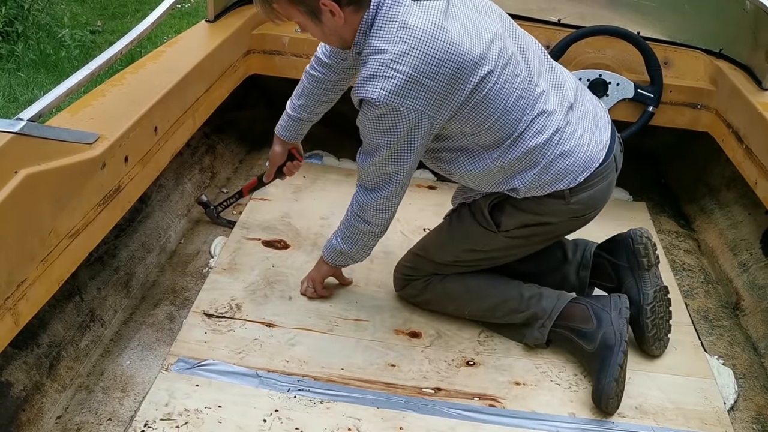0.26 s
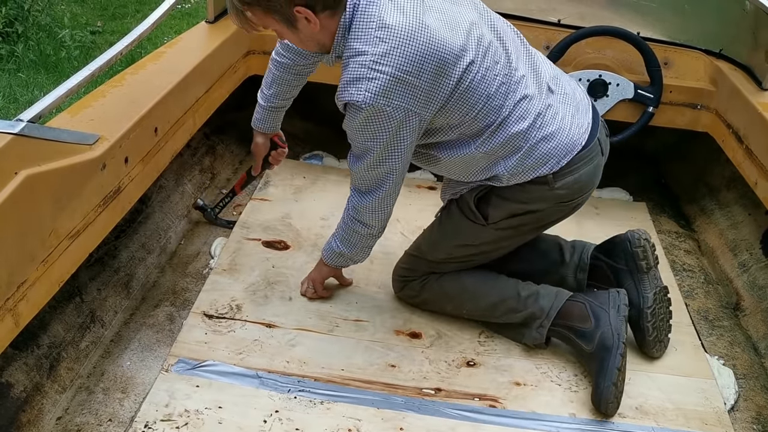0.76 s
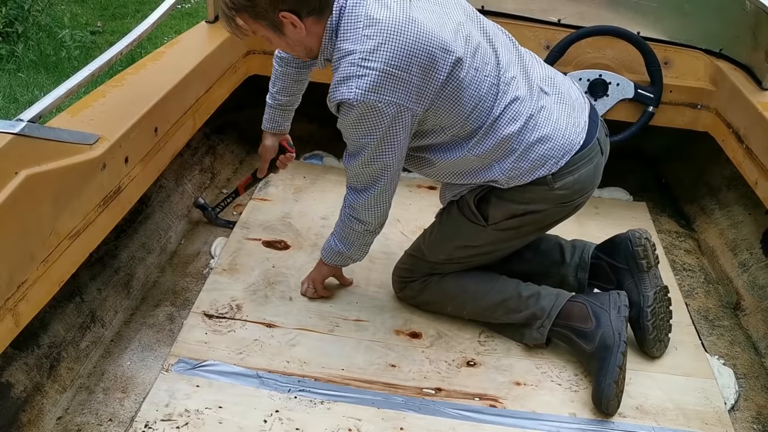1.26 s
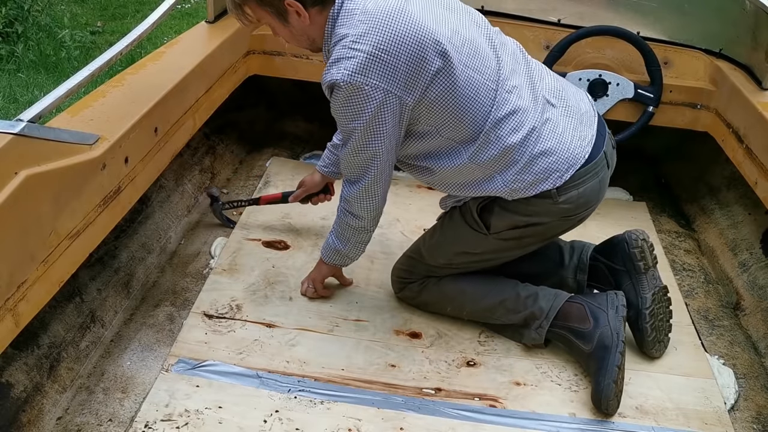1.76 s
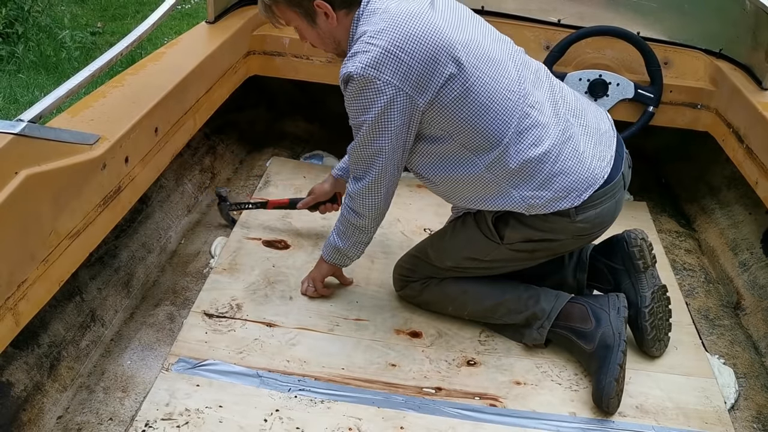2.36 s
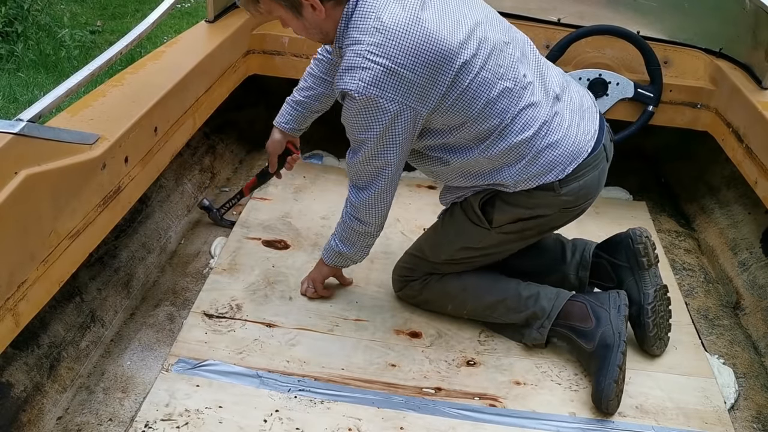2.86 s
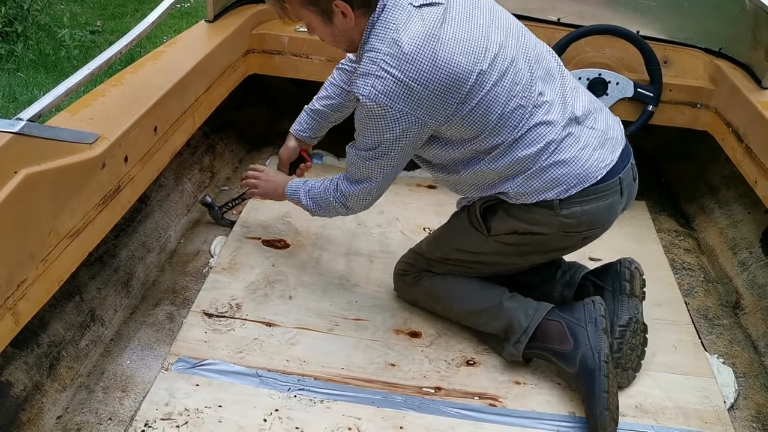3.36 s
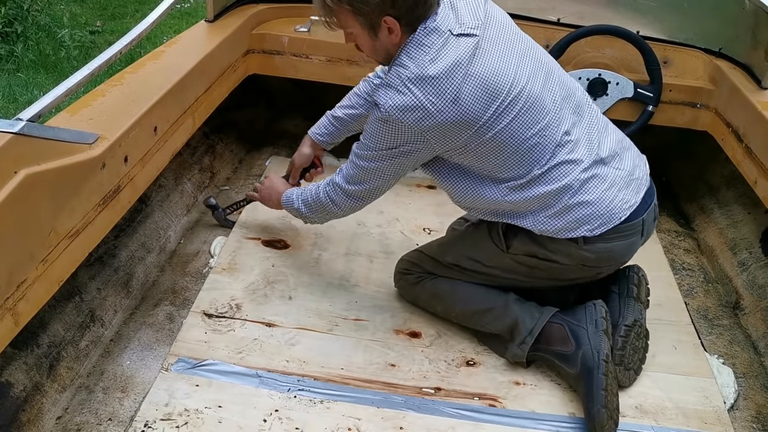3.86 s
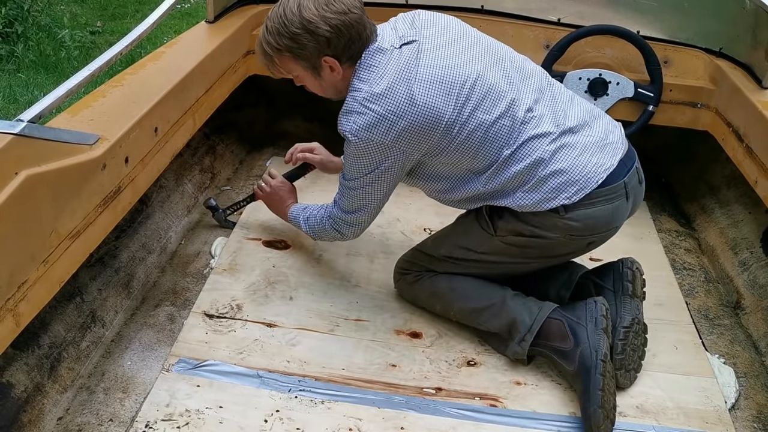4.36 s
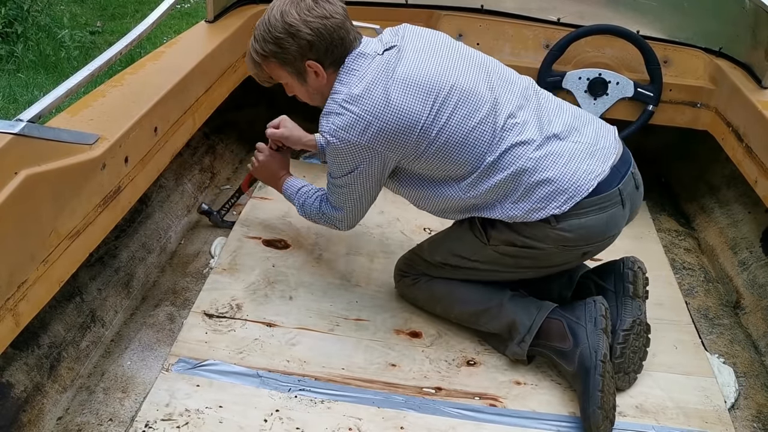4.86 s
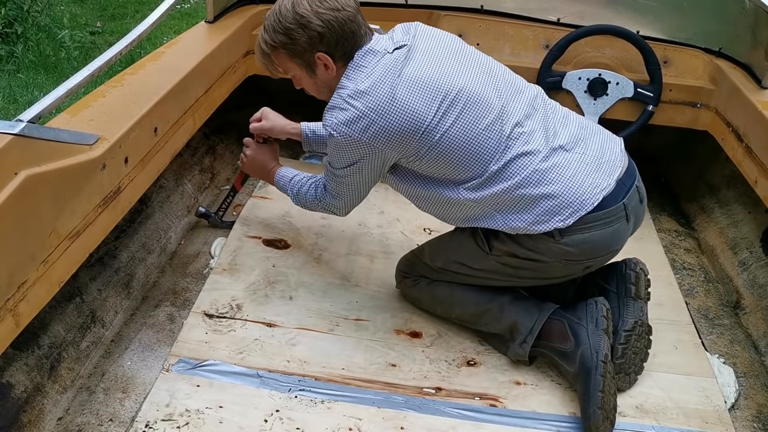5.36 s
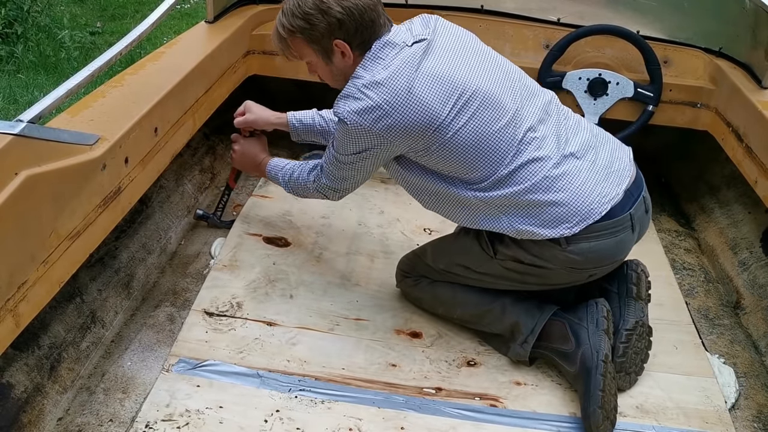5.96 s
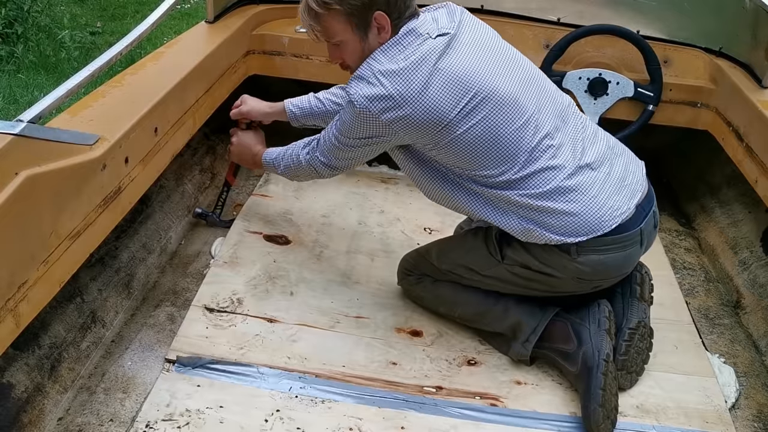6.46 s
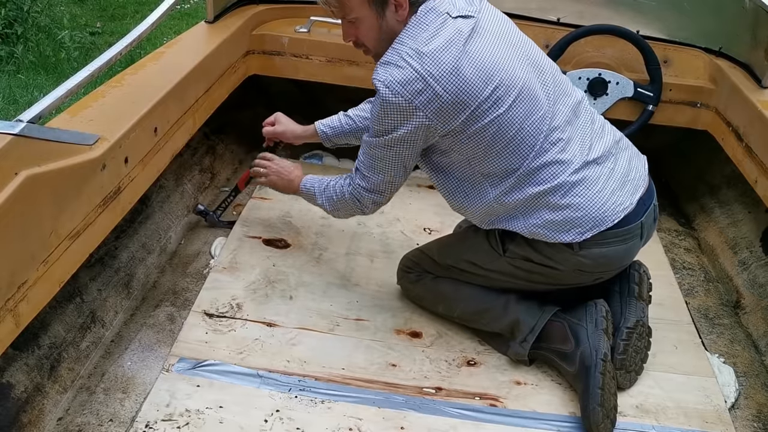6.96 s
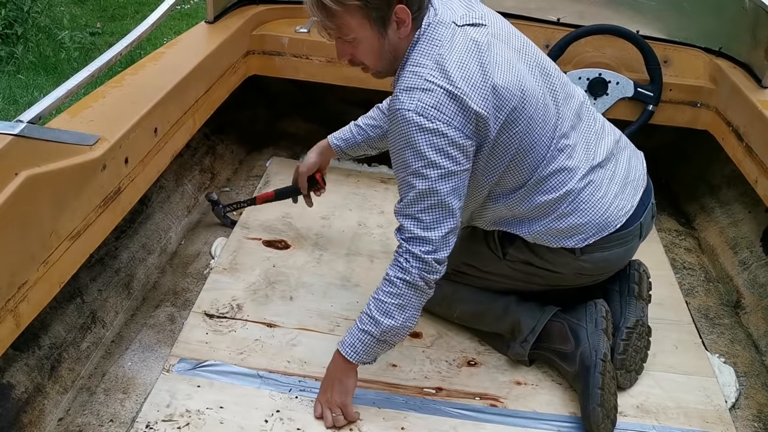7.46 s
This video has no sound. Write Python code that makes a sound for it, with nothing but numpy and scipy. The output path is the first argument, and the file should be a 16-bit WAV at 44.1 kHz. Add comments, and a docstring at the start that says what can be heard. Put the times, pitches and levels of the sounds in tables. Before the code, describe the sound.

Dry, bright scratching and crisp splintering come in bursts as a metal claw pries a plywood edge. The loose sheet answers with low woody thuds and a cluster of rattling knocks. A near lull follows, then several strokes run together, crackling until the board gives with a bang. Near the end a palm rubs wood with a tiny squeak. Short hull echoes, faint outdoor hush and high birdsong.

```python
"""A claw hammer pries at the edge of a plywood floor in an open boat hull. Friction noise, uneven grains through
grit and wood colours, hisses and crunches under each stroke; decaying noise bursts make fibre snaps and knocks.
The loose sheet thuds as soft contact forces ring its modes. A hand rubs the sheet at the end in noise bands, a
small bird calls outside in gliding sines, the hull's sides echo, and coloured noise makes an outdoor hush.
Two unlike microphone ports hear the scene; table levels hold before the mix and the ports."""
import sys
import numpy as np
from scipy import signal
from scipy.fft import rfft, irfft, next_fast_len
from scipy.io import wavfile
from scipy.ndimage import uniform_filter1d, map_coordinates

SR = 44100
rng = np.random.default_rng(int(sys.argv[2]) if len(sys.argv) > 2 else 0)


def master_out(mix):
    """Clip the mix to full scale and print it as 16-bit PCM to the path in sys.argv[1]."""
    frames = np.transpose(np.atleast_2d(mix))
    ceiling = np.clip(frames, -1, 1)
    pcm = np.round(ceiling * 32767).astype(np.int16)
    wavfile.write(sys.argv[1], SR, pcm)


N = 339570  # length in samples


def amp(db):
    """Decibel law: 20 dB is a tenfold amplitude."""
    return 10 ** (np.asarray(db) / 20)


def unit(x):
    """Normalisation to an rms of 1."""
    return x / np.sqrt(np.mean(x ** 2) + 1e-20)


def along(points, hz):
    """Interpolation of (Hz, value) points on a logarithmic frequency axis."""
    f, v = np.transpose(points)
    return np.interp(np.log(hz + 1), np.log(f + 1), v)


def level_curve(rows):
    """Linear interpolation of (s, dB) rows to one level per sample."""
    s, db = np.transpose(rows)
    return np.interp(np.arange(N) / SR, s, db)


def decay(t, t60):
    """Exponential decay: 60 dB down after t60 seconds."""
    return amp(-60 * t / t60)


def wobble(rate):
    """Band-limited chance: a smooth curve through random knots, rate of them a second."""
    return map_coordinates(rng.standard_normal(int(N * rate / SR) + 4), [np.arange(N) * rate / SR])


def filtered(x, response):
    """Linear filtering: the spectrum of x times a complex response of frequency."""
    n = x.shape[-1]
    m = next_fast_len(n + SR // 5)
    return irfft(rfft(x, m) * response(np.fft.rfftfreq(m, 1 / SR)), m)[..., :n]


def resonances(peaks):
    """Modal superposition: causal second-order (Hz, width Hz, dB) resonances of alternating sign."""
    def response(f):
        total = 0
        for k, (c, w, db) in enumerate(peaks):
            total = total + (-1) ** k * amp(db) * 1j * f * w / (c * c - f * f + 1j * f * w)
        return total
    return response


def gritty(per_s, spread_db, smooth):
    """Granular friction: sparse uneven impulses shared by both sides, over noise that differs; rms 1."""
    hit, size, sign = rng.random((3, N))
    sizes = amp(-spread_db * np.log(size + 0.035))
    grains = (hit < per_s / SR) * sizes * np.sign(sign - .5)
    return unit(unit(grains) + smooth * rng.standard_normal((2, N)))


def patchy(x, depth_db):
    """Time-varying spectrum: the colour shifts in random patches as the claw meets other grain."""
    z = signal.stft(x, nperseg=256)[2]
    field = uniform_filter1d(rng.standard_normal(z.shape[1:]), size=8, axis=0)
    field = uniform_filter1d(field, size=12, axis=1)
    return signal.istft(z * amp(depth_db * unit(field)), nperseg=256)[1][:, :N]


def add(track, s, sound, peak_db):
    """Superposition: adds a sound at s seconds, scaled to a peak level."""
    track[..., round(s * SR):][..., :sound.shape[-1]] += amp(peak_db) * sound / np.abs(sound).max()


# Strokes of the claw. Each row: start in seconds, length in seconds, level of the gritty hiss at the
# start in dB, swell up to the end in dB, wooden crunch over the hiss in dB.
CLAW_STROKES = [(0.206, 0.049, -73.5, 15, -13), (0.278, 0.216, -62.5, 2.5, -15),
                (0.514, 0.069, -46, -13.5, 5.5), (0.61, 0.026, -48.5, -5.5, -8.5),
                (0.662, 0.13, -63.5, 14, -1), (0.807, 0.091, -45, 0.5, -3.5), (1.025, .1, -54, 9, -8.5),
                (1.144, 0.12, -54, 2.5, -14), (1.366, 0.115, -78, 3.5, -23), (1.939, 0.042, -69, 8.5, -2.5),
                (2.051, 0.014, -60, -12.5, 3), (2.076, 0.0333, -67, -2.5, 6), (2.299, 0.057, -69, -3, 1.5),
                (2.395, 0.048, -62, 12, 3.5), (2.451, 0.11, -65, -14.5, 13.5),
                (2.801, 0.042, -70.5, 0, -11), (2.967, 0.085, -62, 16.5, -24.5),
                (3.084, 0.03, -49, 7.5, -12.5), (3.15, 0.11, -64, -2.5, 3),
                (3.281, 0.026, -66.5, 3.5, -7.5), (3.421, 0.13, -67.5, -9, -14),
                (3.775, 0.038, -76, -8, -4), (3.95, 0.039, -63.5, -0.5, -13),
                (4.616, 0.21, -65.5, 3, -24.5), (4.818, 0.1674, -61, 19, -21),
                (5.004, 0.097, -48.5, -3.5, -12), (5.109, 0.076, -47.5, 3.5, -12),
                (5.206, 0.065, -51.5, 2, -13), (5.294, 0.076, -50.5, 5.5, -10.5),
                (5.412, 0.14, -53.5, 8.5, -7), (5.589, .11, -47, 1, -7), (5.733, 0.18, -46.5, 0.5, -4),
                (5.935, 0.13, -33, -18.5, -1.5), (6.097, 0.084, -43, 0, 1), (6.181, 0.036, -44.5, 3.5, 1),
                (6.387, 0.044, -67, 10, -17.5), (6.432, 0.071, -47, 7.5, -4), (6.608, 0.06, -65, -12, 5),
                (7.456, 0.027, -71.5, 2.5, 5)]
BITE_DB_PER_S, LIFT_DB_PER_S = 1600, 449  # how fast a stroke sets in and dies away


def strokes():
    """Amplitude envelopes of hiss and crunch: each stroke bites, changes evenly in dB and lifts off."""
    t = np.arange(N) / SR
    hiss, crunch = 0, 0
    for s, length, db, swell_db, crunch_db in CLAW_STROKES:
        edges_db = BITE_DB_PER_S * np.maximum(s - t, 0) + LIFT_DB_PER_S * np.maximum(t - s - length, 0)
        gain = amp(db + swell_db * np.clip((t - s) / length, 0, 1) - edges_db)
        hiss = hiss + gain
        crunch = crunch + amp(crunch_db) * gain
    return hiss, crunch


# Colour of the grit. Each row: frequency in Hz, relative density in dB per Hz.
GRIT_COLOUR = [(1470, -22.5), (2500, -15.5), (2930, -15.5), (5200, -1.5), (5620, -5), (6630, -2.5),
               (7700, -7.5), (9020, 5.5), (10700, 4), (14100, -8.5), (15600, -13.5), (16000, -37)]
# Resonances of the sheet's edge. Each row: frequency in Hz, width in Hz, relative level in dB.
EDGE_MODES = [(485, 330, 1), (880, 380, 4), (1120, 310, 5.5), (1540, 500, 2.5), (2050, 800, 4.5),
              (3250, 3780, -2)]
REST_HISS_DB, REST_CRUNCH_DB = -78.5, -77.5  # the faint fidgeting between strokes
JUDDER_DB, LUMPS_DB = 1.8, 1.5  # scale of the random level swings
CRACKLE_DB, CRACKLE_PER_S = -9, 130  # small fibres under a stroke: level over the hiss, and how often
TICK_S = .0035  # t60 of a fibre's tick


def scrape():
    """Stick-slip friction: fine grains hiss, small fibres crackle, coarse grains crunch in the wood."""
    hiss_gain, crunch_gain = strokes()
    judder = JUDDER_DB * wobble(50)
    fine_grains = patchy(gritty(2500, 0.67, smooth=1.5), depth_db=2.0)
    hiss = unit(filtered(fine_grains, lambda f: amp(along(GRIT_COLOUR, f))))

    tick_t = np.arange(SR // 100) / SR
    tick = rng.standard_normal(len(tick_t)) * decay(tick_t, TICK_S)
    ticks = signal.fftconvolve(gritty(CRACKLE_PER_S, 3.2, smooth=.01), tick[None], axes=1)[:, :N]
    crackle_colour = lambda f: amp(along(GRIT_COLOUR, f)) + amp(-13.5) * resonances(EDGE_MODES)(f)
    crackle = unit(filtered(ticks, crackle_colour))
    crunch = unit(filtered(gritty(500, 3.6, smooth=0.99), resonances(EDGE_MODES)))

    hiss_gain = hiss_gain * amp(judder)
    rest = amp(REST_HISS_DB + 2.2 * wobble(6))
    crunch_gain = crunch_gain * amp(judder + LUMPS_DB * wobble(25)) + amp(REST_CRUNCH_DB)
    return (hiss_gain + rest) * hiss + hiss_gain * amp(CRACKLE_DB) * crackle + crunch_gain * crunch


# Fibres and grit snap under the claw. Each row: start in seconds, peak level in dB,
# body below the top octave (over the grit colour) in dB.
FIBRE_SNAPS = [(0.455, -26, -2.5), (0.508, -12, 4.5), (0.51, -13.5, -2), (0.6111, -15, -1.5),
               (0.8107, -31, 7), (1.1128, -16, -11), (1.12, -21.5, -9), (1.202, -28, -30), (2.0408, -38, 2),
               (2.058, -48, -5), (2.1, -48, -16), (2.3014, -43.5, -13), (2.42, -30, 1), (2.428, -24.5, 1),
               (2.442, -27, -1), (2.4545, -19.5, 2.5), (2.463, -26.5, 4), (2.842, -43, 26),
               (2.982, -42, -11.5), (3.0939, -26.5, -12.5), (3.29, -47, 19), (3.9733, -42, 12),
               (5.0719, -38, -8), (5.1114, -25, -4), (5.1355, -23.5, -15), (5.1654, -19, -8),
               (5.172, -26, -18.5), (5.221, -24.5, -9), (5.2566, -28, -26), (5.3505, -24, -2),
               (5.436, -29, -5), (5.5329, -19.5, -7), (5.5953, -22, -8), (5.614, -26, -25),
               (5.7575, -21, -1), (5.7864, -22, 9), (5.8358, -20, -4), (5.8585, -19.5, -12),
               (5.905, -26, -12), (5.921, -22.5, 0), (5.938, -13.5, 6.5), (6.1024, -27, 12),
               (6.3078, -40, -12), (6.3644, -40.5, -8), (6.426, -49, -5), (6.446, -23, -2),
               (6.5041, -22, -11), (6.764, -43, 7), (6.992, -49, -14), (7.456, -40, 4), (7.48, -38.5, 7)]
SPRAY_DB, SPRAY_S = -19, 0.028  # level and t60 of the grit behind a snap


def snaps():
    """Impulsive fracture: a sharp tick with a spray of grit behind it; bigger fibres give more body."""
    track = np.zeros((2, N + SR))
    t = np.arange(SR // 8) / SR
    for s, db, body_db in FIBRE_SNAPS:
        tick = rng.standard_normal(len(t)) * decay(t, TICK_S)
        spray = rng.standard_normal((2, len(t))) * amp(SPRAY_DB) * decay(t, SPRAY_S)
        tilt = [(6500, body_db), (8200, -2.0), (11500, 3.0), (15000, -6)]  # (Hz, dB)
        colour = lambda f: amp(along(GRIT_COLOUR, f) + along(tilt, f))
        padded = np.pad(tick + spray, ((0, 0), (20, 0)))
        add(track, s, filtered(padded, colour), db)
    return track[:, :N]


# The claw knocks the sheet's edge. Each row: start in seconds, peak level in dB, centre of the colour in Hz.
EDGE_KNOCKS = [(0.5082, -9, 1330), (0.515, -17.5, 1402), (0.611, -34, 1390), (0.735, -36.5, 2100),
               (0.778, -33, 2280), (0.803, -27.5, 1220), (0.829, -26.5, 1820), (1.114, -41, 1080),
               (2.039, -45.5, 1710), (2.406, -29.5, 895), (2.427, -20, 910), (2.453, -16.5, 1040),
               (3.093, -44.5, 566), (3.294, -43, 480), (4.636, -53.5, 712), (4.976, -40.5, 1100),
               (4.993, -34, 910), (5.112, -44, 1140), (5.22, -35.5, 930), (5.345, -48, 1130),
               (5.409, -34, 990), (5.416, -41, 746), (5.7858, -24, 690), (5.836, -32.5, 800),
               (5.908, -37, 1100), (5.937, -18, 750), (6.052, -37, 704), (6.094, -37, 590),
               (6.103, -21.5, 2100), (6.113, -29.5, 2150), (6.125, -23, 1900), (6.186, -25, 490),
               (6.204, -28, 700), (6.218, -31.5, 430), (6.477, -28, 1260), (6.501, -19.5, 520),
               (6.763, -51, 1560), (7.48, -38.5, 1410)]
BLOW_S = .007  # t60 of the blow
RATTLE_DB, RATTLE_S = -10.5, 0.055  # level and t60 of the rattle after it
CRACK_DB = -9  # the broad crack above a knock's own colour


def knocks():
    """Impact excitation: a short rattling contact rings the edge's modes, most those near its colour."""
    track = np.zeros(N + SR)
    t = np.arange(SR // 6) / SR
    for s, db, hz in EDGE_KNOCKS:
        envelope = decay(t, BLOW_S) + amp(RATTLE_DB) * decay(t, RATTLE_S)
        burst = rng.standard_normal(len(t)) * envelope

        def colour(f):
            own = resonances([(hz, 1.1 * hz, 0)])(f) ** 2
            crack = amp(CRACK_DB) * 1j * f / (1j * f + hz)
            return resonances(EDGE_MODES)(f) * (own - crack)
        add(track, s, filtered(burst, colour), db)
    return track[:N]


DETUNE = .012  # share by which a mode wanders from blow to blow


def hull_ring(t, modes):
    """Modal ringing: decaying sines, shifted and reweighted as the loose sheet's load differs each time."""
    ring = 0
    for hz, db, t60 in modes:
        gain = amp(db + rng.normal(0, 4.4)) * decay(t, t60)
        ring = ring + gain * np.sin(2 * np.pi * hz * (1 + DETUNE * rng.normal()) * t)
    return ring


# Modes of sheet and hull. Each row: frequency in Hz, relative level in dB, t60 in seconds.
HULL_MODES = [(60, -14.5, 0.33), (68.8, -3.5, 0.65), (91.8, 5.5, 0.31), (109.2, -5, 0.51), (142, -4, 0.33),
              (172.6, -2, 0.14), (186, -1, 0.2), (197.3, -4, 0.19), (233.6, -2, 0.19), (276.5, 3, 0.1),
              (324.5, -11.5, 0.22), (390, -3.5, 0.15), (442.7, 2.5, 0.061), (480, -5, 0.14),
              (600, -3.5, .085), (666, -4.5, 0.054), (730, -4, 0.088), (787, -12.5, 0.082),
              (866, -7.5, 0.041), (1000, -16.5, 0.033)]
# The sheet lands on the hull. Each row: start in seconds, peak level of the body in dB,
# deep boom relative to it in dB, hard knock relative to it in dB, time scale of the contact in seconds,
# favoured pitch of the sheet in Hz.
SHEET_THUDS = [(.067, -41.5, 2, -39, 0.039, 190), (.167, -55.5, -7, -11, 0.028, 230),
               (0.507, -36.5, -4.5, -0.5, 0.049, 192), (.59, -43.5, -5.5, -14, 0.027, 225),
               (1.486, -45, -5.5, -9.5, 0.12, 202), (1.688, -47, 5.5, -16, 0.097, 191),
               (1.923, -37, -7.5, -51, 0.21, 227), (1.983, -23.5, -38, -11.5, 0.037, 190),
               (2.039, -25.5, -15, -8, 0.079, 190), (2.069, -28, -1, -25, 0.045, 200),
               (2.117, -29.5, 6, -10.5, 0.035, 191), (2.295, -39.5, 4, -8, 0.19, 228),
               (2.353, -35.5, -11, -5, 0.022, 270), (2.398, -35, -13.5, 5, 0.036, 274),
               (2.412, -17.5, -20, -2.5, 0.06, 288), (2.427, -19.5, -26, 4, 0.043, 283),
               (2.451, -13, -7.5, -12.5, 0.044, 230), (2.464, -18.5, -7, -28.5, 0.027, 191),
               (2.497, -25, 6, -31.5, 0.023, 190), (2.572, -28.5, -3.5, -22, 0.018, 177.3),
               (2.753, -49.5, 16.5, -25, 0.061, 196), (3.109, -61.5, -11, 7, 0.18, 300),
               (3.291, -33.5, 2, -17.5, 0.037, 160), (3.351, -51.5, 14, -28, 0.03, 168),
               (3.57, -49, -2, -26, 0.033, 179), (3.828, -57.5, 9.5, 0, 0.04, 220),
               (3.967, -46.5, 4, -13.5, 0.077, 199), (3.997, -38.5, 5, -33, 0.044, 186.4),
               (4.62, -67, 16, 5, 0.079, 199.5), (5.935, -18, -9, -7, 0.017, 198),
               (5.963, -23, 0, -14, 0.015, 186), (6.05, -33.5, -6, -4, 0.01, 230),
               (6.092, -35, -8, 9, 0.017, 278), (6.123, -35, -4.5, -14, .012, 175),
               (6.199, -32, -13, 4.5, 0.011, 260), (6.501, -31.5, -18, -27, 0.0073, 201),
               (6.801, -49, -0.5, -8.5, 0.065, 191), (7.453, -43, -6.5, -7, 0.046, 203),
               (7.512, -31.5, 0, -34, 0.054, 172)]
# The sheet rocks on the hull under shifting weight. Each row: time in seconds, level in dB.
SHEET_ROCKING = [(0.0, -48), (0.2, -61), (0.34, -81), (1.82, -61), (2.19, -66), (2.3, -52), (2.64, -48),
                 (2.92, -68.5), (3.4, -68), (4.1, -61), (4.7, -75), (5.85, -58.5), (6.0, -43),
                 (6.13, -45.5), (6.28, -57), (7.0, -66), (7.48, -64), (7.56, -46), (7.7, -46)]
LANDING_S, LANDING_DB = 0.0028, -13  # first touch of a thud: length, and strength over the rattle


def favour(modes, centre):
    """Selective excitation: modes weaken with their distance in octaves from the favoured pitch."""
    return [(c, level - 28 * np.log2(c / centre) ** 2, t60) for c, level, t60 in modes]


def sheet():
    """Forced vibration: rattling soft contacts and a steady rocking drive the modes of sheet and hull."""
    track = np.zeros(N + SR)
    t = np.arange(SR // 3) / SR
    # wood on wood is soft, and the open hull radiates no deep bass
    soft = lambda f: (1j * f / (1j * f + 55)) ** 2 / (1 + 1j * f / 1100) ** 2
    deep = [m for m in HULL_MODES if m[0] < 128]
    body = [m for m in HULL_MODES if 128 < m[0] < 380]
    hard = [m for m in HULL_MODES if m[0] > 380]
    for s, db, deep_db, hard_db, length, hz in SHEET_THUDS:
        u = t / length
        landing = amp(LANDING_DB) * np.sin(np.pi * np.minimum(t / LANDING_S, 1))
        rattle = rng.standard_normal(len(t)) * (1 - np.exp(-9 * u)) * np.exp(-2.5 * u)
        force = filtered(landing + rattle, soft)
        boom = favour(deep, hz / 2)  # the boom leans an octave lower
        for modes, level_db in [(boom, deep_db), (favour(body, hz), 0), (hard, hard_db)]:
            add(track, s, signal.fftconvolve(force, hull_ring(t, modes))[:len(t)], db + level_db)
    force = filtered(amp(4.4 * wobble(14)) * rng.standard_normal(N), soft)
    ring = amp(10.5) * hull_ring(t, deep) + hull_ring(t, body) + amp(-13.0) * hull_ring(t, hard)
    rocking = unit(signal.fftconvolve(force, ring)[:N])
    return track[:N] + amp(level_curve(SHEET_ROCKING)) * rocking


# Course of the hand rub. Each row: time in seconds, level in dB.
RUB_LEVEL = [(7.5, -64.5), (7.606, -50.5), (7.7, -52.5)]
# Hollow bands of the rub. Each row: frequency in Hz, width in Hz, relative level in dB.
RUB_BANDS = [(750, 140, -0.5), (917, 100, 2.5), (1070, 79, -0.5), (1406, 230, -6), (4160, 3500, -16.5)]
# Thin squeaks. Each row: start in seconds, frequency in Hz, width in Hz, level in dB.
RUB_SQUEAKS = [(7.39, 1857, 59.5, -74), (7.515, 5550, 260, -84), (7.55, 1906, 140, -70.5),
               (7.629, 3660, 200, -69), (7.671, 2350, 110, -55.5)]


def rub():
    """Frictional resonance: a hand's slips on wood sound in hollow bands; thin squeaks join one by one."""
    t = np.arange(N) / SR
    slips = gritty(650, 2.2, smooth=1.4)
    hollow = unit(filtered(slips, lambda f: resonances(RUB_BANDS)(f) ** 2))
    sound = (t > RUB_LEVEL[0][0]) * amp(level_curve(RUB_LEVEL)) * hollow
    for s, hz, width, db in RUB_SQUEAKS:
        thin = unit(filtered(slips, lambda f: resonances([(hz, width, 0)])(f) ** 2))
        sound += np.clip((t - s) / 0.022, 0, 1) * amp(db + 3.3 * wobble(33)) * thin
    return sound


# Calls of the bird. Each row: start in seconds, length in seconds, settled pitch in Hz, level before
# swell and fade in dB, scale of the pitch tremble in Hz, fall onto the pitch in Hz.
BIRD_CALLS = [(-.08, .2, 7030, -70.5, 120, 250), (1.405, .22, 7000, -66.5, 120, 350),
              (1.663, .08, 9120, -64, 320, 100), (1.668, .016, 7100, -72, 50, 1900),
              (1.72, .097, 8700, -69, 700, 300), (1.729, .016, 7200, -67, 50, 1900),
              (2.1, .14, 7480, -74, 100, 100), (2.15, .12, 4130, -77, 80, 100),
              (2.52, .17, 2220, -72.5, 50, 200), (2.845, .25, 6950, -64, 120, 250),
              (2.87, .1, 4350, -73, 60, 200), (3.85, .17, 7400, -75, 100, 200),
              (6.815, .24, 6980, -68.5, 120, 250), (7.55, .16, 7450, -72, 100, 200)]
CALL_ATTACK, DROP_SHARE = 0.23, 0.27  # swell, and time constant of the fall, as shares of a call's length
CALL_FADE_DB = 13.5  # fade reached at a call's end
TREES_DB, TREES_S = -1, .42  # level and t60 of the echoes around the bird


def bird():
    """Frequency modulation: thin whistles tremble too fast to follow, quick chips fall, echoes smear both."""
    track = np.zeros(N)
    tremble = wobble(1000)
    for s, length, hz, db, blur_hz, drop_hz in BIRD_CALLS:
        u = np.clip((np.arange(N) / SR - s) / length, 0, 1)
        gate = np.minimum(u / CALL_ATTACK, 1) * (u < 1) * amp(-CALL_FADE_DB * u ** 2)
        pitch = hz + drop_hz * np.exp(-u / DROP_SHARE) + blur_hz * tremble
        track += gate * amp(db + 2.7 * wobble(60)) * np.sin(2 * np.pi * np.cumsum(pitch) / SR)
    echoes = rng.standard_normal((2, SR // 2)) * decay(np.arange(SR // 2) / SR, TREES_S)
    echoes = echoes / np.linalg.norm(echoes[0])
    return track + amp(TREES_DB) * signal.fftconvolve(track[None], echoes, axes=1)[:, :N]


# Decay between the hull's sides. Each row: frequency in Hz, t60 in seconds.
HULL_DECAY = [(150, 0.18), (600, 0.14), (2000, 0.063), (10000, 0.043)]
# Coherence of the two ports. Each row: frequency in Hz, left-right likeness from 0 to 1.
PORT_LIKENESS = [(60, 0.97), (130, 0.87), (300, 0.85), (650, 0.25), (1400, 0.088), (3000, 0.014)]


def cockpit(x):
    """Reverberation: each frequency dies at its own speed, and the bass reaches both ports nearly alike.
    The sound wanders at random between two sets of echoes, so the treble stays diffuse."""
    hz, t, z = signal.stft(rng.standard_normal((2, 2, SR // 3)), SR, nperseg=256)
    share = np.clip(along(PORT_LIKENESS, hz), 0, 1)[:, None]
    z[:, 1] = share * z[:, 0] + np.sqrt(1 - share ** 2) * z[:, 1]
    t60 = along(HULL_DECAY, hz)[:, None]
    tails = signal.istft(z * decay(t, t60), SR, nperseg=256)[1]
    tails = tails / np.linalg.norm(tails[0, 0])
    turn = 3.15 * wobble(8)
    parts = np.array([np.cos(turn), np.sin(turn)])[:, None] * x
    delayed = np.pad(parts, ((0, 0), (0, 0), (100, 0)))  # samples before the first echo
    return signal.fftconvolve(delayed, tails, axes=2)[..., :N].sum(axis=0)


# Colour of the outdoor hush. Each row: frequency in Hz, relative density in dB per Hz.
HUSH_COLOUR = [(25, 10), (80, 0), (138, -14), (181, -10.5), (251, -23), (924, -21), (1720, -32.5),
               (2200, -30.5), (2970, -40.5), (6340, -47.5), (7880, -54), (10900, -37.5), (15100, -46.5),
               (16400, -38.5)]


def hush():
    """Diffuse field: far noise, strongest in the bass, swells slowly; only its bass is alike at both ports."""
    turn = lambda f: np.arccos(np.clip(along(PORT_LIKENESS, f), 0, 1)) / 2
    colour = lambda f: amp(along(HUSH_COLOUR, f)) * [np.cos(turn(f)), np.sin(turn(f))]
    mid, side = filtered(rng.standard_normal((2, N)), colour)
    return amp(-58.0 + 1.8 * wobble(1.3)) * unit(np.array([mid + side, mid - side]))


def scene():
    """Superposition of direct sounds, hull echoes and background."""
    near = scrape() + snaps() + knocks() + rub()
    low = sheet()
    direct = amp(-1.5) * near + low + bird()
    return direct + cockpit(amp(-6.5) * near + amp(-11.0) * low) + hush()


# Unlike colour of the two ports. Each row: frequency in Hz, left minus right in dB.
PORT_DIFFERENCE = [(60, -2.5), (200, -1.5), (400, 2), (1000, 3.5), (2500, 3.5), (4500, -0.5), (7300, -5.5),
                   (8600, 15), (11000, 21), (15000, 8.5)]
TOP_HZ = 16280  # band limit


def record(dry):
    """Spaced-pair stereo: left hears 6 samples earlier, brighter on top; nothing passes the band limit."""
    def ports(f):
        right = amp(-along(PORT_DIFFERENCE, f))  # relative to the left
        left = 2 / np.sqrt(1 + right ** 2) * (1j * f / (1j * f + 42)) ** 2  # the deepest bass is cut
        delay = np.exp(-2j * np.pi * f * 6 / SR)
        return np.array([left, left * right * delay]) * (f < TOP_HZ)
    return filtered(dry, ports)


dry = scene()
out = record(dry)
master_out(out)
```